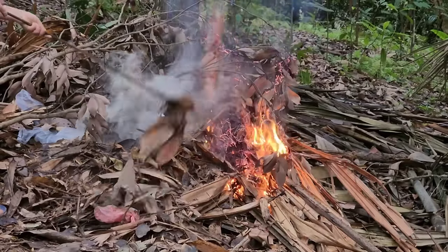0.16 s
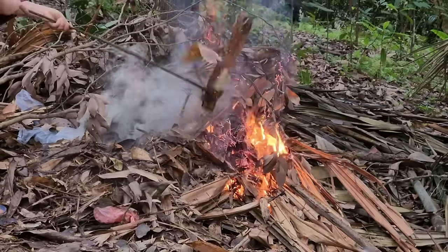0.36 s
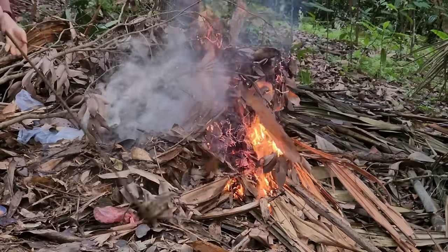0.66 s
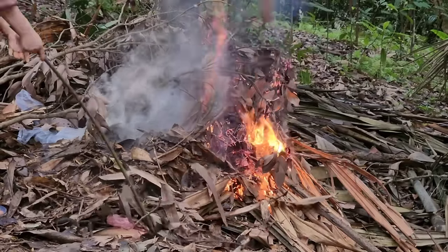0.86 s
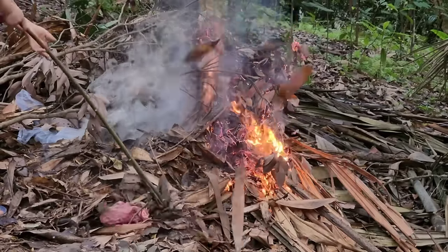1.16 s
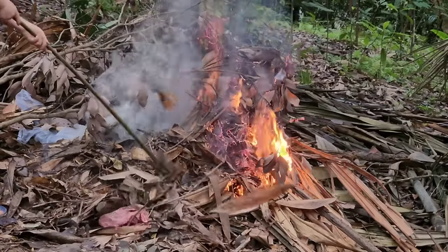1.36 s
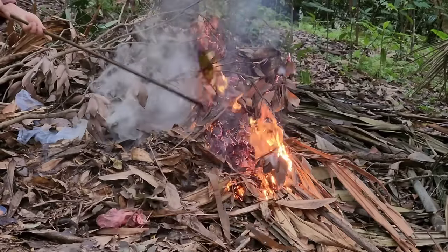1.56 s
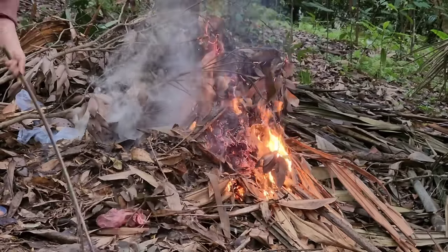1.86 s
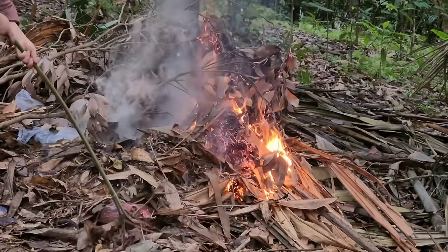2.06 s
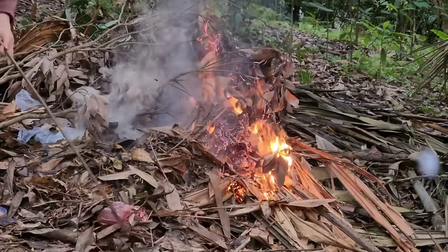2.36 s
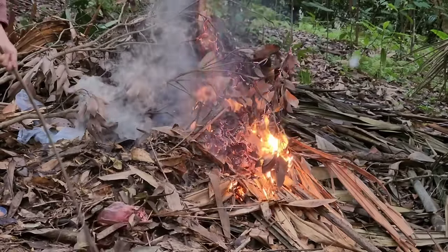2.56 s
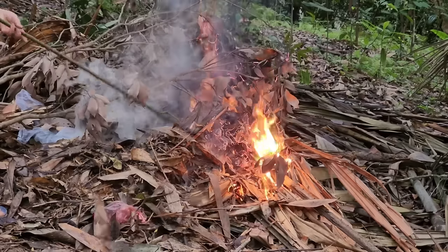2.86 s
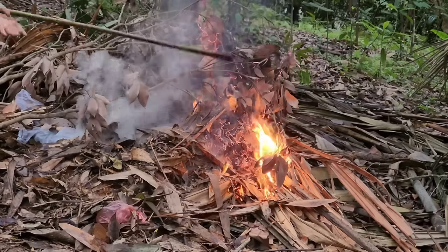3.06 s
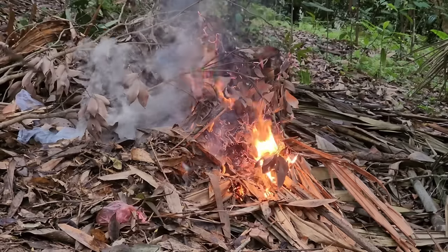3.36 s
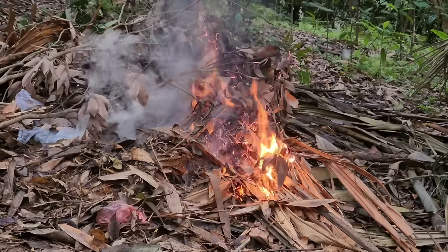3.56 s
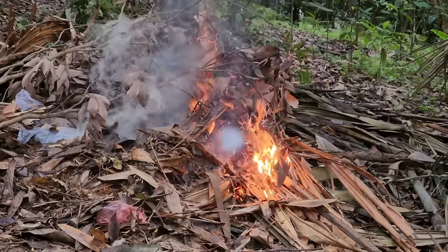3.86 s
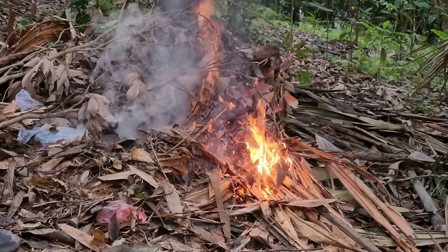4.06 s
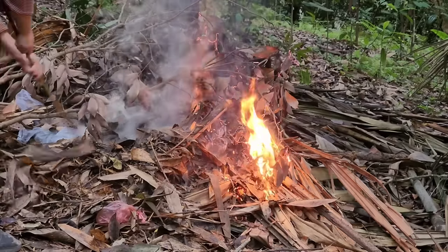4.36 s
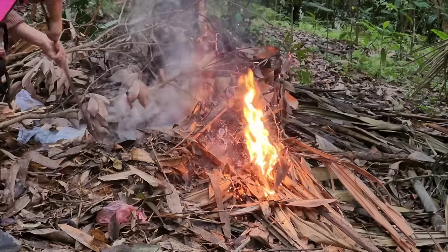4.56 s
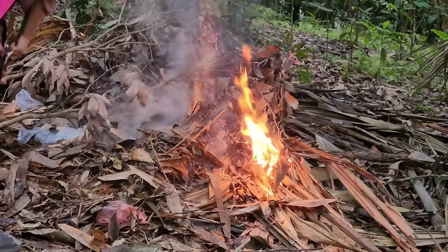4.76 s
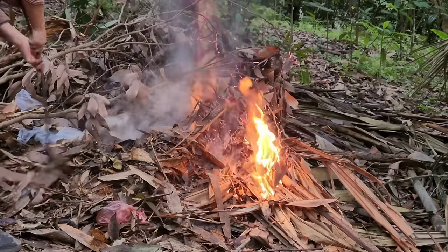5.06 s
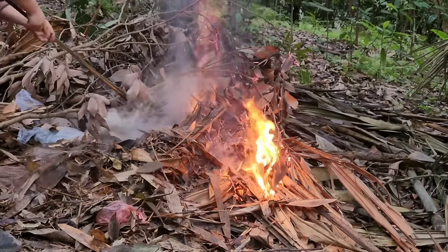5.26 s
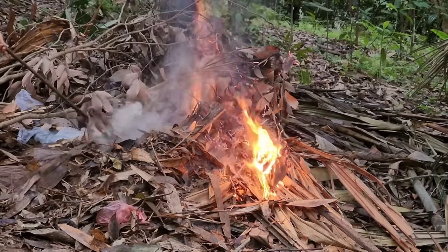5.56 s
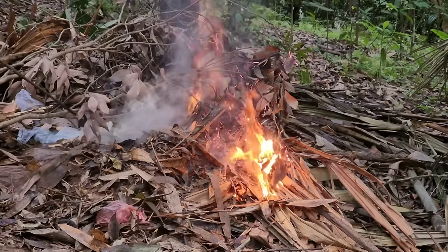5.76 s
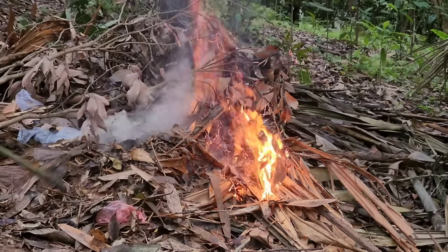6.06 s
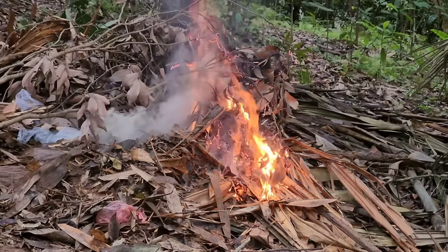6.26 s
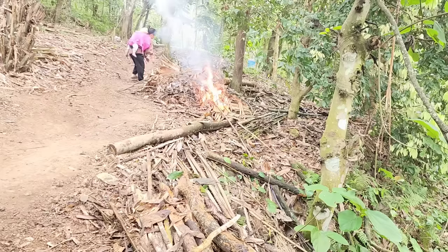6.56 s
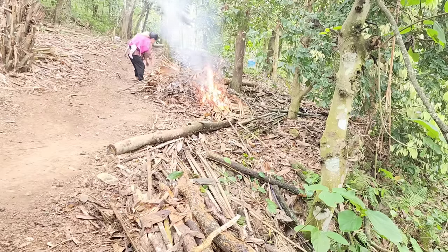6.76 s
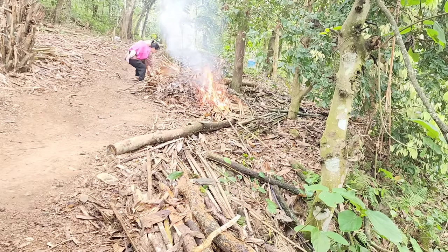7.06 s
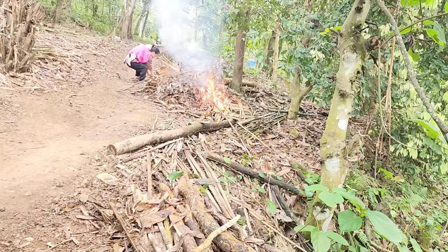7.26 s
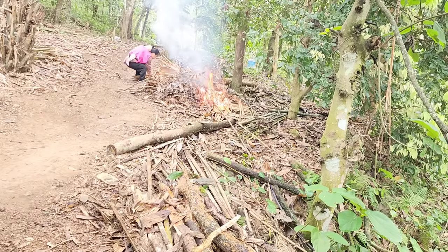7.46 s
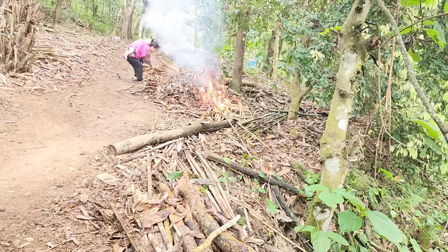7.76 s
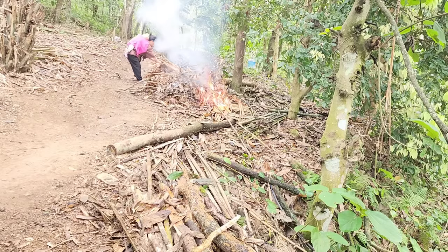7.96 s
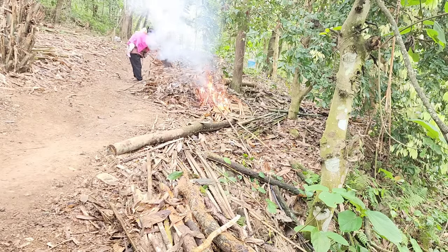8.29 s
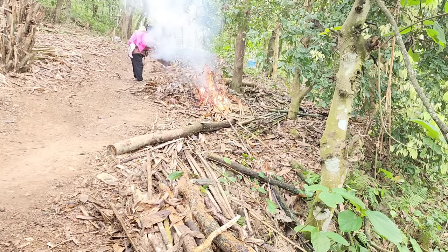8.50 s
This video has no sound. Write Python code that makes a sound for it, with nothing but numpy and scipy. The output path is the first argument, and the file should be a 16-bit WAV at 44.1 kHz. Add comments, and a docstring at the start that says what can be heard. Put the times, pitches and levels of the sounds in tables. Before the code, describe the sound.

Close to a burning heap of dry leaves and bamboo outdoors, steam hisses over a faint fluttering low roar. Stems pop sharply and irregularly, leaves tick, and a stick rakes rustling debris with small woody knocks. At about six and a half seconds the sound fades out briefly, then returns from farther away with fewer, weaker pops. A small stereo microphone gives a bright, dry sound.

```python
"""A heap of dry leaves and bamboo burns outdoors: flames roar low as fluttering bass noise, sap steam hisses.
Stems pop as shaped noise with a pressure jump and spit steam; dry leaves tick.
A stick rakes in more leaves, heard as swelling noise and small breaks; knocks and thuds ring as damped sines.
The sound fades out and back in, now from farther away.
A small two-port microphone colours the two sides differently."""
import sys
import numpy as np
from scipy import signal
from scipy.fft import rfft, irfft, next_fast_len
from scipy.io import wavfile
from scipy.ndimage import uniform_filter1d, map_coordinates

SR = 44100
rng = np.random.default_rng(int(sys.argv[2]) if len(sys.argv) > 2 else 0)


def dump_mix(stems):
    """Bounce the given channels to the path in sys.argv[1] as a 16-bit WAV at rate SR."""
    frames = np.atleast_2d(stems).T  # one column per channel
    limited = np.clip(frames, -1, 1)  # hard clip at full scale
    pcm = np.round(limited * 32767).astype(np.int16)
    wavfile.write(sys.argv[1], SR, pcm)


N = 380583

FADE_OUT_START_S, FADE_OUT_END_S = 6.51, 6.588
FADE_IN_START_S, FADE_IN_END_S = 6.645, 6.79

# spectrum of escaping steam, relative: frequency_hz, density_db
STEAM_SPECTRUM = [(2240, -31), (3800, -5), (4030, -5.5), (4270, -5), (5470, -5), (6720, -5), (7430, -4.5),
                  (8920, -6), (11700, 0.5), (14900, -2.5), (15500, -1.5)]
# spectrum of dry leaves, relative: frequency_hz, density_db
LEAF_SPECTRUM = [(530, -57), (900, -10.5), (1400, 1.5), (1630, -1.5), (1890, 1), (2170, -6), (2390, 0.5),
                 (2660, -4.5), (3000, 3), (3260, -1), (4500, -4.5), (5850, -16), (9900, -120)]
# how hard the heap burns, near and then far: time_s, hiss_db
BURNING = [
    [(0, -48), (.18, -41), (.29, -47.5), (.54, -45), (1.12, -44.5), (1.4, -42), (1.64, -47.5),
     (1.92, -41.5), (2.41, -44), (2.79, -42.5), (3.24, -43.5), (3.87, -46.5), (4.05, -38.5), (4.14, -42.5),
     (4.33, -44.5), (4.7, -44.5), (5.07, -42.5), (5.31, -45.5), (5.45, -41.5), (5.85, -45.5), (5.96, -40),
     (6.19, -51.5), (6.3, -44), (6.5, -47.5)],
    [(6.66, -40), (6.9, -43), (7.4, -41), (7.7, -43), (8.63, -43)],
]


def amp(db):
    """Decibels are logarithmic: 20 dB is a tenfold amplitude."""
    return 10 ** (np.asarray(db) / 20)


def unit(x):
    """Mean power is the mean square: scale x to an rms of 1."""
    return x / np.sqrt(np.mean(x ** 2) + 1e-20)


def along(points, hz):
    """Pitch is logarithmic: interpolate (hz, value) points on a log axis."""
    f, v = np.transpose(points)
    return np.interp(np.log(hz + 1), np.log(f + 1), v)


def curves(places):
    """Slow change is piecewise linear: one value a sample for each column after the time, through all places."""
    s, *columns = np.transpose(np.concatenate(places))
    return [np.interp(np.arange(N) / SR, s, column) for column in columns]


def wobble(rate):
    """Turbulence is a smooth random fluctuation: a spline through rate random knots a second."""
    knots = rng.standard_normal(N // 100)
    return map_coordinates(knots, [np.arange(N) * rate / SR])


def filtered(x, response):
    """Convolution theorem: multiply the spectrum of x by a response of frequency."""
    m = next_fast_len(x.shape[-1] + 8192)
    spectrum = rfft(x, m) * response(np.fft.rfftfreq(m, 1 / SR))
    return irfft(spectrum, m)[..., :x.shape[-1]]


def lifted(x, db, centre_hz, width_hz):
    """Resonant emphasis: a Gaussian band of x is raised or lowered by db."""
    band = filtered(x, lambda hz: np.exp(-((hz - centre_hz) / width_hz) ** 2))
    return x + (amp(db) - 1) * band


def rush(spectrum, envelope=1., blows=0.):
    """Partly coherent noise: modulated white noise and blows common to both ports, then coloured."""
    # likeness of left and right: frequency_hz, correlation
    likeness = [(60, 0.95), (150, 0.96), (380, 0.77), (950, 0.64), (2380, 0.57), (5980, 0.026),
                (15000, -0.14)]
    points = [(0.77, -120)] + list(spectrum) + [(SR / 2, -120)]
    colour = lambda hz: amp(along(points, hz))
    # the correlation is the cosine of twice this angle
    turn = lambda hz: np.arccos(np.clip(along(likeness, hz), -1, 1)) / 2
    power = np.sqrt(np.mean(colour(np.linspace(0, SR / 2, num=20000)) ** 2))
    noise = envelope * rng.standard_normal((2, N))
    noise = noise + blows * np.array([[1], [0]])
    response = lambda hz: colour(hz) / power * [np.cos(turn(hz)), np.sin(turn(hz))]
    mid, side = filtered(noise, response)
    return np.array([mid + side, mid - side])


def drifting(centre_hz, width_hz):
    """Quadrature modulation: two slow noises on a moving carrier make a stereo band of noise."""
    a, b = filtered(rng.standard_normal((2, 2, N)), lambda hz: np.exp(-(hz / width_hz) ** 2))
    phase = 2 * np.pi * np.cumsum(centre_hz) / SR
    return unit(a * np.cos(phase) + b * np.sin(phase))


def bursts(times, levels_db, t60):
    """Exponential decay: an envelope that jumps at each time and falls 60 dB in t60 seconds."""
    kicks = np.bincount((np.asarray(times) * SR).astype(int), amp(levels_db), N + SR)[:N]
    return signal.lfilter([1], [1, -amp(-60 / (t60 * SR))], kicks)


def crackle(per_second, spread_db, t60, cap=0.0267):
    """Poisson process: random tiny breaks, many faint and a few stronger, as an envelope of rms 1."""
    draw = rng.random((8000, 2))
    times = np.cumsum(-np.log(draw[:, 0])) / per_second
    heard = times < N / SR
    levels_db = -spread_db * np.log(abs(cap) + draw[heard, 1])
    return unit(bursts(times[heard], levels_db, t60))


def grains(per_second, centre_hz, octaves, cycles, spread_db):
    """Poisson train of damped oscillators: tiny rings of random pitch, size and side, rms 1."""
    draw, pitch = rng.random((6000, 3)), rng.standard_normal(6000)
    start = (np.cumsum(-np.log(draw[:, 0])) / per_second * SR).astype(int)
    hz = np.clip(centre_hz * 2 ** (octaves * pitch), 200, 14000)[:, None]
    step = np.arange(400)
    turns = hz * step / SR
    size = amp(-spread_db * np.log(0.019 + draw[:, 1:2]))
    ring = size * np.sin(2 * np.pi * turns) * np.exp(-turns / cycles)
    at = np.minimum(start[:, None] + step, N).ravel()
    side = np.pi / 2 * (0.29 + 0.86 * draw[:, 2:])
    both_sides = [np.bincount(at, (ring * gain(side)).ravel(), N + 1)[:N] for gain in (np.cos, np.sin)]
    return unit(np.array(both_sides))


def flames(ticks):
    """Turbulent combustion noise: burning flutters in the bass, and steam jets hiss, crackle and sizzle."""
    # the flames, near and then far: time_s, drone_db, roar_db
    flame_levels = [
        [(0, -53, -50), (.2, -48.5, -48.5), (.3, -50, -56.5), (.55, -51, -50.5), (.85, -59, -53.5),
         (1.2, -42, -51), (1.4, -52.5, -50.5), (1.57, -39.5, -52.5), (1.72, -48, -50.5), (1.92, -48, -54.5),
         (2.45, -47.5, -47.5), (2.58, -47, -48), (2.8, -50, -51.5), (3.13, -47.5, -52), (3.3, -51, -54),
         (3.7, -52.5, -51), (3.87, -43, -54), (4.05, -53.5, -52.5), (4.33, -49, -46.5), (4.58, -46, -51.5),
         (4.76, -52, -46), (5.2, -52.5, -51), (5.9, -47, -47.5), (6.3, -50, -52), (6.55, -42, -42)],
        [(6.66, -55, -53), (7.2, -57, -55.5), (8, -60.5, -57.5), (8.3, -54, -51.5), (8.63, -62, -53.5)],
    ]
    # low drone, relative: frequency_hz, density_db
    drone_spectrum = [(30, -29), (44, -8.5), (52, -5), (60, -6), (75, -20.5)]
    # roar, relative: frequency_hz, density_db
    roar_spectrum = [(20, -33), (40, -24), (70, -1.5), (120, 0), (155, -5.5), (200, -11), (260, -18),
                     (350, -32.5)]
    # wet stems sizzling in two bands, near and then far: time_s, lower_db, upper_db
    sizzle_levels = [
        [(0, -61, -51), (.4, -67, -44), (.8, -52, -45), (1.1, -53.5, -53), (2, -48, -65), (2.6, -55, -63),
         (2.91, -54, -39.5), (3.2, -49, -46), (3.84, -44.5, -55), (4.1, -44.5, -48), (5.3, -46.5, -45.5),
         (6, -56, -51), (6.5, -53.5, -54)],
        [(6.64, -61, -50), (8.63, -66, -47.5)],
    ]
    # lower sizzle band, relative: frequency_hz, density_db
    stem_spectrum = [(4200, -34), (4900, -8), (5500, -2), (6100, -11.5), (7000, -26)]
    # drift of the upper sizzle band: time_s, centre_hz
    upper_centre = [(0, 7140), (.9, 7250), (1.5, 7700), (2.7, 6900), (3.4, 8080), (3.8, 7280), (8.63, 7380)]
    # level of the hiss around 9.2 kHz: time_s, level_db
    hiss_band = [(0, -4), (1.5, 1.5), (2.5, 1), (3, 0), (4, 1.5), (5, -3.5), (5.6, -2), (6.5, -4),
                 (6.7, 1.5), (8.63, 0)]
    drone_db, roar_db = curves(flame_levels)
    hiss_db, = curves(BURNING)
    lower_db, upper_db = curves(sizzle_levels)
    band_db, = curves([hiss_band])

    drone = rush(drone_spectrum, amp(drone_db + 0.6 * wobble(7.4)))
    roar = rush(roar_spectrum, amp(roar_db + 2.9 * wobble(20)))

    smooth_hiss = rush(STEAM_SPECTRUM, amp(hiss_db + 0.64 + 1.9 * wobble(25)))
    crackling_hiss = rush(STEAM_SPECTRUM, amp(hiss_db - 3.0) * ticks)
    hiss = lifted(smooth_hiss + crackling_hiss, band_db, 9200, 1100)

    sputter = 0.35 + 0.7 * crackle(per_second=160, spread_db=4, t60=0.01, cap=.06) + 0.45 * ticks
    lower = rush(stem_spectrum, amp(lower_db - 6 + 1.5 * wobble(14)) * sputter)
    upper = drifting(curves([upper_centre])[0], width_hz=400) * amp(upper_db - 10.5) * sputter
    sizzle = (lower + upper) * amp([[-3], [3]])  # stronger on the right

    far_db = np.where(np.arange(N) / SR < FADE_IN_START_S, 0, -6)
    tiny_rings = grains(per_second=450, centre_hz=5620, octaves=0.82, cycles=2.4, spread_db=4)
    snaps = amp(hiss_db - 11 + far_db) * tiny_rings
    return drone + roar + hiss + snaps + sizzle


def pops():
    """Impulsive rupture: faint noise swells just before each crack, a pressure jump, then ragged steam."""
    # bursting cells: start_s, crack_db, body_db, top_db, left_over_right_db, steam_db (12 ms later)
    pop_events = [(0.0259, -21, -9.5, -2.5, -1.5, -13.5), (.197, -35.5, -12, 3, -4, -18),
                  (0.3078, -34, -23, 0, -4, -10), (.385, -34.5, -28, 0, -3, -32),
                  (0.4108, -32.5, -24, 1, -3, -15), (0.418, -38.5, -22, 7, 0, -10),
                  (0.569, -38, -10, 5.5, -3, -11), (0.6265, -27, -9, 0.5, -3, -12),
                  (0.68, -33.5, -20, -11, -4, -13), (0.7212, -34, -25, -12, -7, -11),
                  (.7428, -38, -24, 3, -2, -10), (0.831, -30, -5, -3, 3, -19),
                  (.8343, -28.5, -15, -3, -9, -14), (0.8798, -31.5, -3, 3, -5, -16),
                  (0.914, -35, -18, -20, -5, -16), (1.0638, -34.5, -22, 0, -2, -15),
                  (1.079, -35, -14, 3, -1, -7), (1.22, -34.5, -23, -0.5, -4, -4),
                  (1.2836, -30.5, -25, -11, -4, -22), (1.3118, -36, -26, -5, -7, -11),
                  (1.4677, -28.5, -12, 1.5, -3, -8.5), (1.513, -34.5, -25, 2, 0, -5),
                  (1.525, -34.5, -19, 0, -6, -4), (1.5855, -31, -23, -15, -4, -10),
                  (1.694, -23.5, -8.5, -2.5, -1, -19), (1.792, -25, -10.5, -2, -4, -8),
                  (1.971, -38, -19, 10, -6, -17), (1.9866, -13.5, -12.5, -4, -3.5, -20),
                  (2.122, -37, -21, 6, -3, -6.5), (2.221, -36, -13, 0.5, -2, 1),
                  (2.3404, -37.5, -21, -3, -4, -6), (2.539, -31.5, -9, 4.5, -2, -7.5),
                  (2.6265, -27, -2.5, -7, -5.5, -18), (2.7775, -17, -20.5, -6.5, -3.5, -21),
                  (2.866, -33, -15, 1, -6, -36), (3.0399, -30.5, -12, 1, -5, -10),
                  (3.16, -27.5, -13, -1, -3, -11), (3.1843, -35.5, -23, -4, -1, -11),
                  (3.289, -38, -25, -6, -5, -25), (3.304, -36.5, -13, 0, -3, -2.5),
                  (3.3863, -29, -13, -1.5, -5, -15), (3.4434, -25, -14, -4, -4.5, -10.5),
                  (3.5852, -27.5, -19, 5.5, -4.5, -4), (3.7271, -25.5, -24, 1, -4, -8.5),
                  (3.844, -28, -13.5, -2, -3.5, -13), (3.855, -27, -14, -2, -10, -28),
                  (3.863, -34, -19, -2, -2, 2), (3.949, -37, -12, -14, -8, -24),
                  (3.972, -32.5, -23, -4, -8, -24), (4.0627, -33.5, -23, 0, -6, -13),
                  (4.1345, -33, 0.5, -1.5, -2, -26), (4.1695, -18, -17, 1.5, -5.5, -14),
                  (4.238, -34, -1, 0, -3, -13), (4.5582, -35.5, -5.5, -2, -5, -5),
                  (4.6304, -28, -9, 2, -7.5, -7.5), (4.64, -32, -9, 0, 1, -4.5),
                  (4.789, -28, -11.5, 0.5, -5, -8), (4.985, -40, -20, 2, -14, -11),
                  (5.0194, -36, -5, 1, -5, -6), (5.1887, -35.5, -7, -2, -4, -5.5),
                  (5.3674, -34, -7, -0.5, -6, -9), (5.388, -38, -6.5, 4, -1, -4),
                  (5.4196, -38, -27, -1.5, -9, -4.5), (5.942, -38, -9, 3.5, -5, -4.5),
                  (5.9938, -15, -7, -2.5, -8.5, -22.5), (6.0807, -35.5, -20, 0, -7, -8),
                  (6.2232, -36, -24, 0, -4, -7), (6.417, -37.5, -3.5, -1.5, -3, -5),
                  (6.4366, -33, -3.5, -12, -5, -26), (6.493, -40, -18, -2, -3, -4),
                  (6.517, -17, -10, -4.5, -4.5, -16.5), (6.9143, -38, -20, 5, 0, -9.5),
                  (7.0548, -35, -9, -11, -2, -12), (7.259, -41, -20, 5, -6, -11),
                  (7.3127, -34, -3.5, -6, -5, -10), (7.386, -38.5, -19, 12.5, -5, -26),
                  (7.4052, -39.5, -14.5, 8, -2, -19), (8.032, -38, -11, -0.5, -3, -3.5)]
    # low part of a crack, relative: frequency_hz, density_db
    body_spectrum = [(120, -30), (300, -16.5), (700, -13), (1300, -0.5), (1900, -1), (2500, -3)]
    # middle part of a crack, relative: frequency_hz, density_db
    snap_spectrum = [(1500, -6), (2100, 2), (5500, 9), (8500, 8.5), (10000, -20)]
    # high part of a crack, relative: frequency_hz, density_db
    top_spectrum = [(8000, -16), (9300, -1), (12000, 2.5), (15500, -2.5), (16700, -63)]
    peak_s = .0005  # a crack builds this long
    blow = 1.5  # the single pressure jump that opens a crack, over its noise
    ground_s, ground_db, ground_top_hz = 0.001679, -13, 7040
    s, crack_db, body_db, top_db, pan_db, steam_db = np.transpose(pop_events)
    # more steam spits on for longer
    steam_t60 = np.clip(0.16 + 0.005 * steam_db, .06, .3)

    lead = SR // 100
    t = (np.arange(SR // 4) - lead) / SR
    after = np.maximum(t, 0)
    ragged = 0.6 + 0.38 * crackle(per_second=450, spread_db=3.0, t60=0.0056, cap=.2)
    lead_in = (t < 0) * np.exp(np.minimum(t, 0) / 0.0038)
    rise = np.minimum(after / peak_s, 1) ** 2
    # spectrum, relative level dB, gain dB, decay t60 s, steam gain dB
    parts = [(body_spectrum, body_db, 4.5, .007, -3),
             (snap_spectrum, 0 * s, 5.6, .0055, -1.5),
             (top_spectrum, top_db, 4.6, .0065, .1)]
    hold = lambda x: uniform_filter1d(x, size=200) + 1e-6  # the side of a pop covers its whole crack
    sound = np.zeros((2, N))
    for spectrum, rel_db, gain_db, t60, wet_db in parts:
        envelope = np.zeros((2, N + SR))
        jump_at = ((s + peak_s) * SR).astype(int)
        blows = np.bincount(jump_at, blow * amp(crack_db + rel_db + gain_db), N)
        crack = rise * amp(gain_db - 60 * np.maximum(after - peak_s, 0) / t60)
        events = zip(s, crack_db + rel_db, pan_db, steam_db + wet_db, steam_t60)
        for start, db, pan, tail_db, tail_t60 in events:
            i = int(start * SR) - lead
            steam = (1 - np.exp(-after / 0.003)) * amp(-60 * (after - .012) / tail_t60)
            around = amp(tail_db) * (steam + 1.65 * lead_in) * np.resize(ragged[i:], len(t))
            sides = amp(db + pan / 2 * np.array([[1], [-1]]))
            envelope[:, i:i + len(t)] += sides * (crack + around)
        left, right = envelope[:, :N] + 1e-9
        both = (left + right) / 2
        balance = [hold(left) / hold(both), hold(right) / hold(both)]
        sound += rush(spectrum, both, blows) * balance
    # the ground repeats each crack, duller
    delay = lambda hz: np.exp(-2j * np.pi * hz * ground_s - (hz / ground_top_hz) ** 2)
    return sound + amp(ground_db) * filtered(sound, delay)


def leaf_ticks():
    """Brittle fracture: a dry leaf breaks in one thin tick, a jump with briefly decaying noise."""
    # the loudest single leaves breaking: start_s, level_db, mids_over_treble_db
    tick_events = [(0.1137, -24, -7), (0.2414, -26, -10), (0.5257, -36, -8), (0.7614, -26, -5),
                   (0.8474, -33, -4), (0.9204, -32, -1), (1.1927, -34, -8), (1.268, -21.5, -7),
                   (1.3377, -24, 0.5), (1.354, -23, -1), (1.4142, -19, -5), (1.5395, -24, -6),
                   (1.5675, -20, -8), (1.5804, -25, 0), (1.8696, -32, -1), (2.0516, -21, -4),
                   (2.143, -29, -4), (2.4209, -36, -4), (2.4433, -39, -2), (2.4915, -30, -4),
                   (2.688, -27, -7), (2.798, -20, -6), (2.8384, -25, -4), (2.918, -29, -7),
                   (2.9647, -26, 0), (3.0114, -25, -10), (3.0949, -30, -4), (3.3463, -29, 0),
                   (3.5274, -35, -10), (3.5803, -21, -8.5), (3.602, -23, -7), (3.613, -23, -7),
                   (3.722, -21, -6), (3.8726, -22, -1), (3.905, -29, -7), (3.9923, -34.5, -8),
                   (4.051, -35, -11), (4.0786, -31, -6), (4.1655, -19.5, -7.5), (4.2067, -22, -10),
                   (4.2756, -28, 0), (4.3296, -28, -8), (4.378, -26, 1), (4.468, -27, 1), (4.6872, -29, -4),
                   (4.7431, -31, -4), (4.938, -20, -10), (5.017, -29.5, -1), (5.0679, -33, -7),
                   (5.0818, -30, -2), (5.091, -28, -6), (5.223, -21, -10), (5.24, -20, -12),
                   (5.468, -31, -8), (5.53, -35, -4), (5.6107, -38, -9), (5.7585, -21.5, -2),
                   (5.8758, -26, 1), (6.2512, -28, -2), (6.2986, -29, -10), (6.3974, -28.5, -8),
                   (7.13, -23.5, -4), (7.319, -27, -8), (7.496, -26, -11), (7.5305, -24, -4),
                   (7.8106, -30, 3), (8.435, -29, 3)]
    s, db, mids_db = np.transpose(tick_events)
    db = db - 6  # the peak stands this far over the noise level
    jump = lambda level: np.bincount((s * SR).astype(int), 1.7 * amp(level), N)
    tick = lambda spectrum, level: rush(spectrum, bursts(s, level, t60=0.006), jump(level))
    return tick(STEAM_SPECTRUM, db) + tick(LEAF_SPECTRUM, db + mids_db)


def rake(ticks):
    """Friction noise: leaves slide in a soft wash with small breaks; the heap below shifts with dull knocks."""
    # leaves raked or dropped: peak_s, heap_db, rustle_db, length_s
    strokes = [(.17, -48, -42.5, 0.14), (0.479, -51, -50.5, 0.06), (0.634, -58, -51, 0.068),
               (0.89, -41, -42, 0.13), (1.36, -58.5, -51.5, 0.18), (1.557, -55, -47.5, 0.071),
               (1.992, -61, -49.5, 0.43), (2.101, -46.5, -40, 0.086), (2.258, -65, -45, 0.034),
               (2.587, -49, -46, 0.085), (2.698, -57, -43.5, 0.038), (2.774, -50, -46, 0.15),
               (2.988, -61, -50, 0.09), (3.14, -73, -47.5, .13), (3.445, -58, -50, 0.11),
               (3.625, -63, -47, 0.076), (3.755, -65, -44.5, 0.13), (3.866, -48.5, -48, 0.085),
               (3.983, -58, -50, 0.062), (4.28, -53, -44, 0.18), (4.385, -49, -40, 0.11),
               (5.122, -50.5, -42.5, 0.22), (5.413, -65, -63.5, 0.15), (5.885, -68, -41.5, 0.029),
               (6.02, -62, -42.5, 0.089), (6.267, -59, -40, 0.047), (6.54, -50, -41.5, 0.073),
               (7.247, -72, -60, 0.11), (7.543, -55, -47.5, 0.18), (7.81, -53, -44.5, 0.32),
               (8.268, -52, -42, 0.24), (8.433, -49, -41, 0.061), (8.6, -52.5, -45.5, 0.23)]
    # settling heap and leaves, relative to the hiss: time_s, heap_db, rustle_db, brightness_db
    bed = [
        [(0, -14, -7, 1), (2, -13.5, -6.5, 0.5), (3.5, -19, -6.5, 0.5), (5.6, -14, -5, 0),
         (6.5, -14.5, -4.5, -1.5)],
        [(6.66, -19, -9, 1), (7.4, -20.5, -9, 2), (8.63, -13, -4, -3)],
    ]
    # shifting heap, relative: frequency_hz, density_db
    heap_spectrum = [(120, -3), (200, -8.5), (296, -2.5), (431, -13), (632, -5), (806, -9.5), (1300, -7),
                     (1690, -18), (2860, -120)]
    s, heap_db, rustle_db, length = np.transpose(strokes)[:, :, None]
    since = (np.arange(0, N, 64) / SR - s) / length
    # 19 dB up over 1.16 lengths, 19 dB down over one
    stroke_db = -19 * np.maximum(since, -since / 1.16)
    swell = lambda db: np.repeat(np.sqrt(np.sum(amp(db + stroke_db) ** 2, axis=0)), 64)[:N]
    burn_db, = curves(BURNING)
    bed_heap_db, bed_rustle_db, bright_db = curves(bed)
    stroke_rustle = swell(rustle_db)
    # independent sources add in power
    moving = np.hypot(amp(burn_db + bed_heap_db), swell(heap_db))
    rustle = np.hypot(amp(burn_db + bed_rustle_db), stroke_rustle)

    heap_knocks = crackle(per_second=65, spread_db=5.5, t60=0.025, cap=.12)
    heap = rush(heap_spectrum, moving * (0.53 + 0.38 * heap_knocks))
    wash = rush(LEAF_SPECTRUM, rustle * amp(-4.0 + 2.6 * wobble(30)))
    breaks = rush(LEAF_SPECTRUM, rustle * amp(-4.0) * ticks)
    upper = filtered(wash + breaks, lambda hz: hz > 2380)
    brightening = (amp(bright_db) - 1) * upper
    treble = rush(STEAM_SPECTRUM, stroke_rustle * amp(-0.5) * (1.32 + 0.35 * ticks))
    tiny_rings = grains(per_second=600, centre_hz=1110, octaves=.8, cycles=4.2, spread_db=5)
    scrapes = stroke_rustle * amp(-10) * tiny_rings
    return scrapes + heap + wash + breaks + brightening + treble


def knocks():
    """Damped free vibration: knocks, thumps and the low thuds under the loudest pops each ring at one pitch."""
    # knocks, thumps and thuds: start_s, level_db, pitch_hz, t60_s (held to 6-50 ms below), left_over_right_db
    knock_events = [(.146, -40, 634, .02, 0), (0.48, -40, 170, 0.027, 0), (.487, -43, 350, .02, 0),
                    (.83, -32, 660, 0.02, 0), (.848, -36, 900, .012, 0), (0.8805, -26.5, 231, 0.018, 0),
                    (.913, -27, 960, 0.011, 0), (0.92, -28, 1130, 0.011, 0), (0.963, -46, 300, 0.012, 0),
                    (1.334, -35, 670, 0.037, 2), (2.083, -47, 300, 0.018, 0),
                    (2.103, -36.5, 695, 0.056, -2), (2.312, -39, 200, .03, 0), (2.548, -27, 150, .035, 1),
                    (2.567, -36, 1480, .044, 2), (2.569, -38, 680, 0.037, -2), (2.625, -35, 500, .012, -2),
                    (4.169, -31, 180, 0.045, 2), (4.274, -38.5, 760, .04, 0), (4.29, -39, 520, .02, 0),
                    (4.559, -38, 185, 0.046, -3), (5.083, -38, 298, 0.022, 0), (5.171, -38, 690, .015, 0),
                    (5.9924, -26.5, 170, 0.013, -15), (5.994, -21, 484, 0.0046, -18),
                    (6.5161, -28, 191, 0.014, -4), (6.5165, -21.5, 450, 0.0062, -21),
                    (7.313, -31, 1600, .006, -2), (7.789, -35, 925, .025, 0), (8.259, -40, 300, .02, 0),
                    (8.405, -30, 1380, 0.033, 0), (8.426, -36, 1390, .03, 0)]
    sound, t = np.zeros((2, N + SR)), np.arange(SR // 4) / SR
    for s, db, hz, t60, pan_db in knock_events:
        onset = 1 - np.exp(-t / 0.00063)
        decay = amp(-60 * t / np.clip(t60, .006, .05))
        ring = np.sin(2 * np.pi * hz * t) * onset * decay
        sides = amp(db + pan_db / 2 * np.array([[1], [-1]]))
        sound[:, int(s * SR):][:, :len(t)] += sides * ring
    return sound[:, :N]


def ports(x):
    """Linear filtering: the two sides differ in tone; a plain low-pass at 15640 Hz follows."""
    # balance of the ports: frequency_hz, left_over_right_db
    port_tilt = [(60, 0.5), (130, -0.5), (290, 1), (640, 2), (1410, -2), (3100, 0.5), (6820, -7.5),
                 (15000, 3)]
    sides = np.array([[1], [-1]])
    return filtered(x, lambda hz: amp(along(port_tilt, hz) / 2 * sides) * (hz < 15640))


def scene():
    """Superposition: pops carry their own side; the other layers take the balance of the ports."""
    # level of the whole fire around 3.3 kHz: time_s, level_db
    mid_band = [(0, 0), (2.6, 0), (3.4, -3), (4.4, -5), (5.1, -5), (5.6, -5), (6.4, -4), (6.66, -2),
                (8.63, -2)]
    # one leaf breaking sounds in both mids and treble
    ticks = crackle(per_second=600, spread_db=6.5, t60=.0045, cap=.08)
    # ticks are weaker from farther away
    ticks = ticks * np.where(np.arange(N) / SR < FADE_IN_START_S, 1, amp(-3.5))
    mid_db, = curves([mid_band])
    # cracks gain 0.66 dB near 5.7 kHz for each dB lost near 3.3 kHz
    cracks = lifted(pops() + ports(leaf_ticks()), -0.66 * mid_db, 5740, 700)
    steady = ports(flames(ticks) + rake(ticks) + knocks())
    return lifted(cracks + steady, mid_db, 3310, 1100)


def record(dry):
    """Saturation and band limit: soft clipping of the loudest cracks, a fade out and in, then a low-pass."""
    fade_times = [FADE_OUT_START_S, FADE_OUT_END_S, FADE_IN_START_S, FADE_IN_END_S]
    fade = np.interp(np.arange(N) / SR, fade_times, [1, 0, 0, 1]) ** .8
    clipped = dry / (1 + np.abs(dry / .8) ** 4) ** (1 / 4)
    return filtered(clipped * fade, lambda hz: hz < 16750)


dry = scene()
out = record(dry)
dump_mix(out)
```